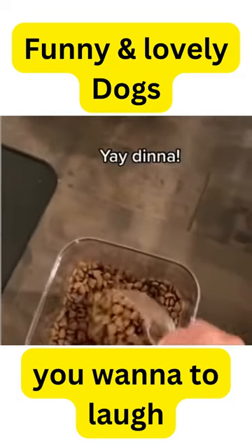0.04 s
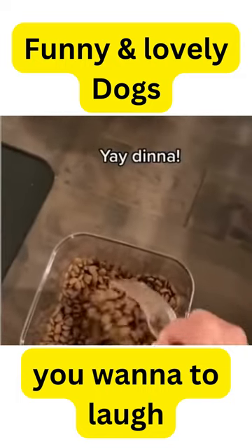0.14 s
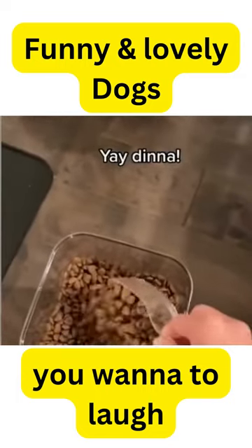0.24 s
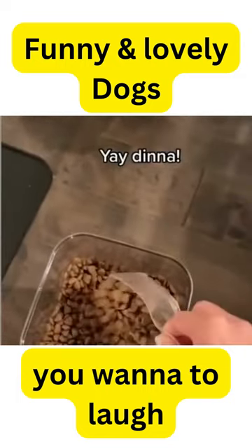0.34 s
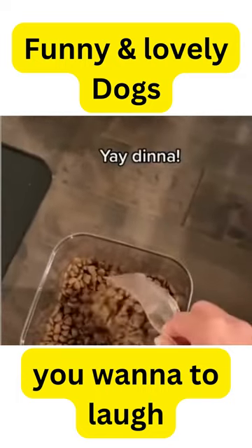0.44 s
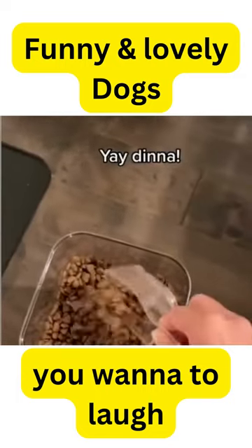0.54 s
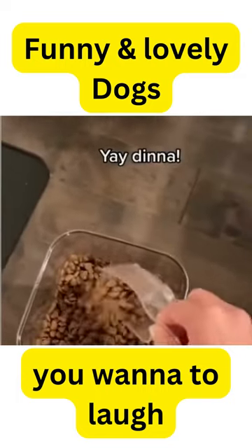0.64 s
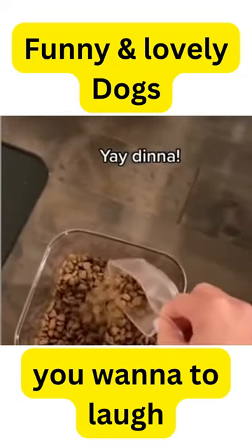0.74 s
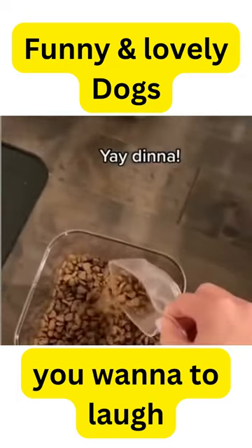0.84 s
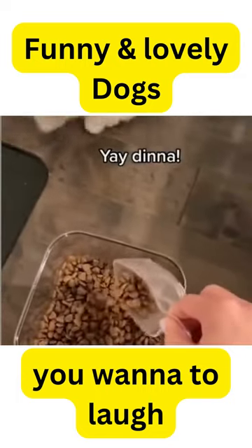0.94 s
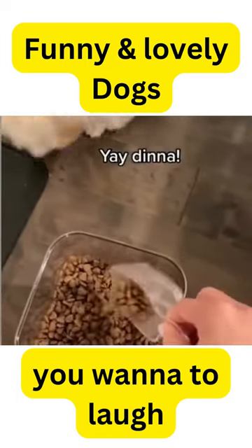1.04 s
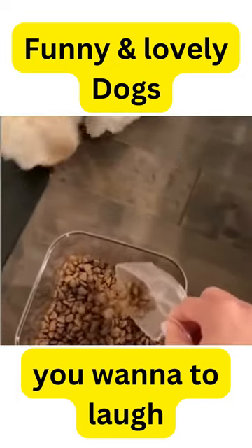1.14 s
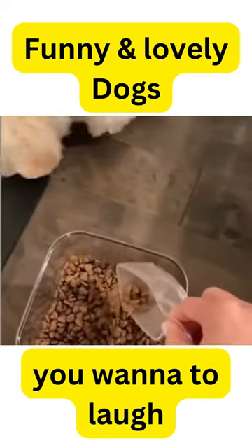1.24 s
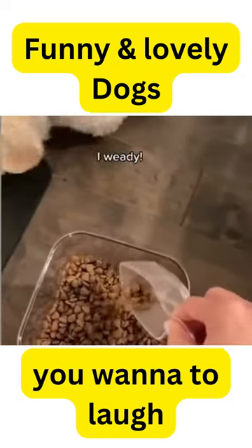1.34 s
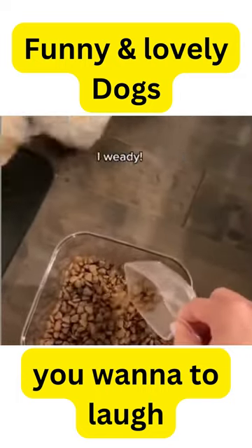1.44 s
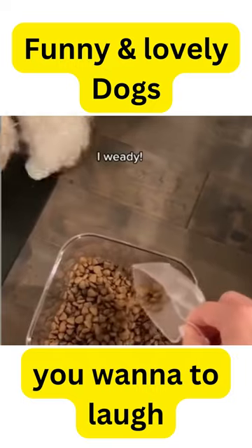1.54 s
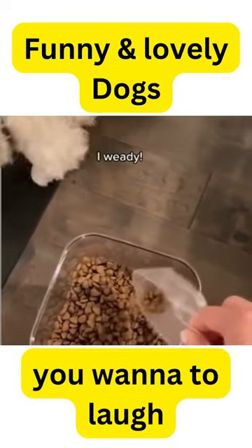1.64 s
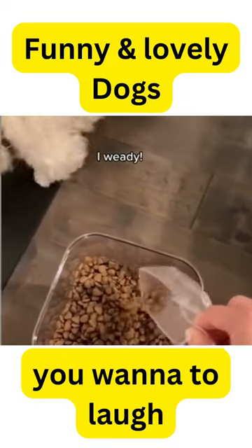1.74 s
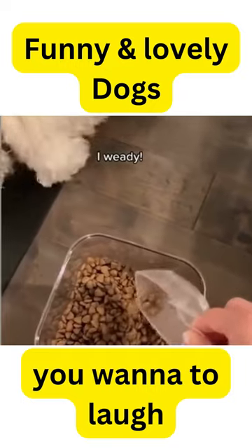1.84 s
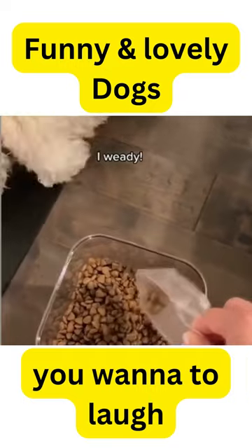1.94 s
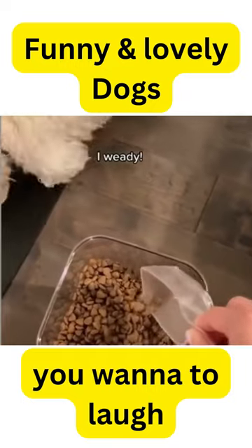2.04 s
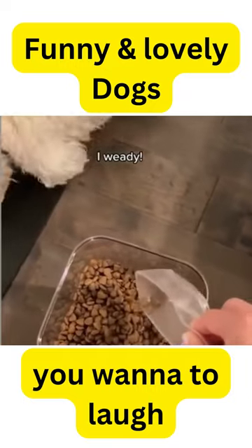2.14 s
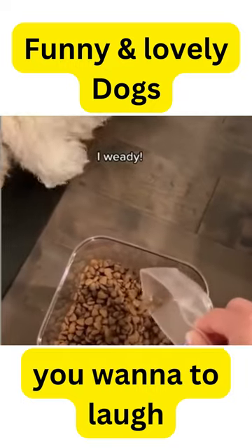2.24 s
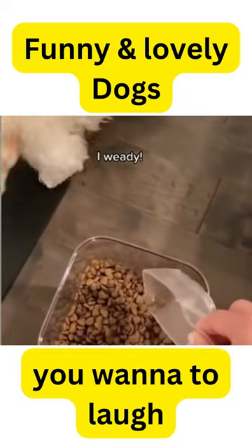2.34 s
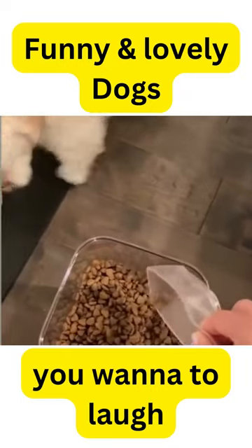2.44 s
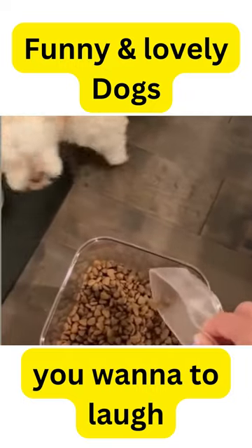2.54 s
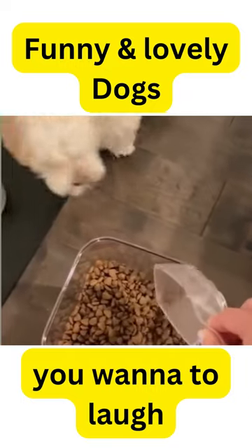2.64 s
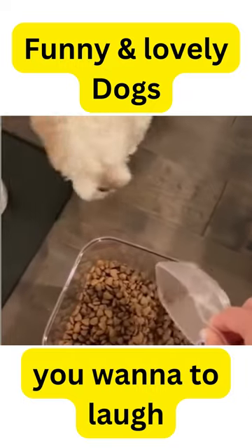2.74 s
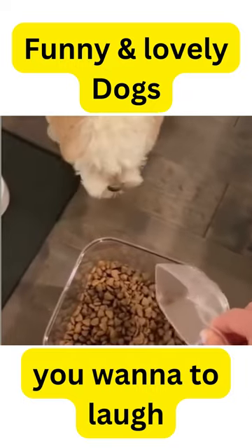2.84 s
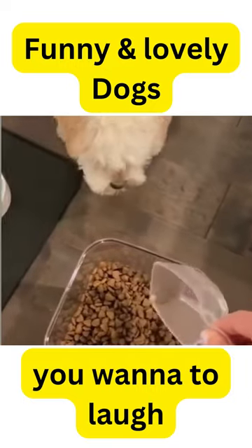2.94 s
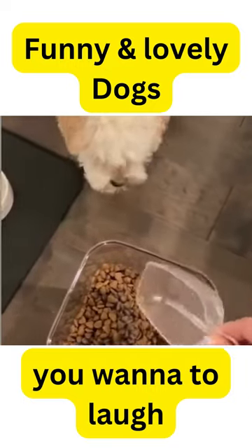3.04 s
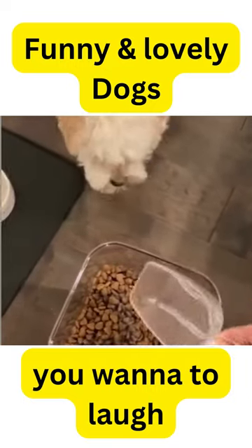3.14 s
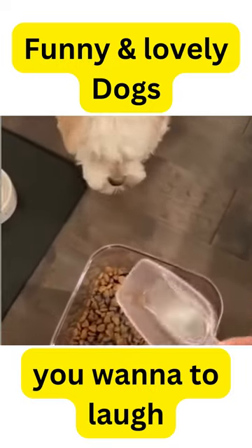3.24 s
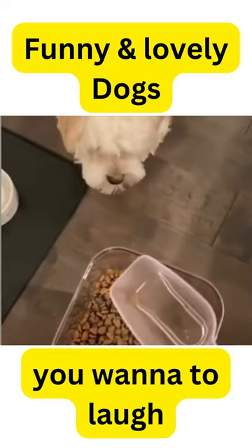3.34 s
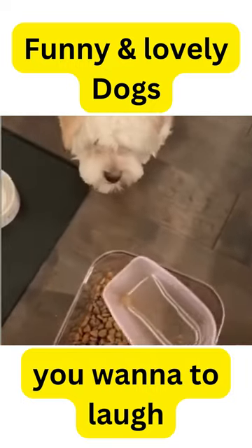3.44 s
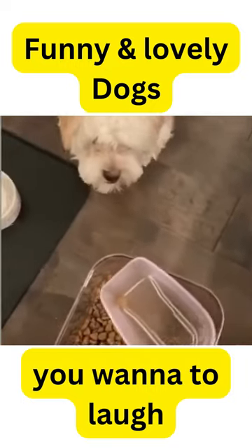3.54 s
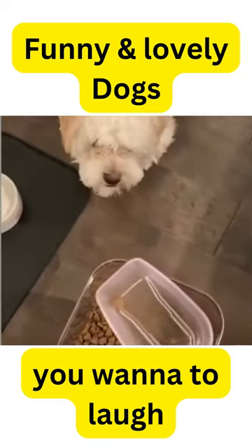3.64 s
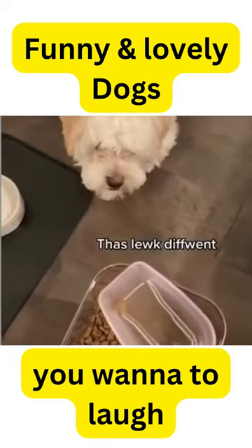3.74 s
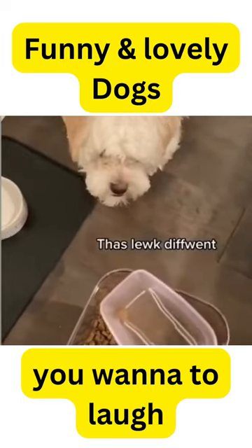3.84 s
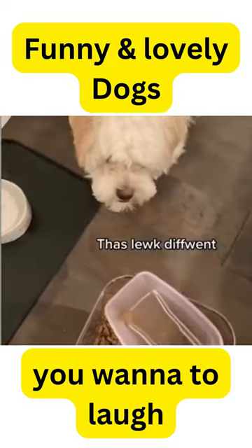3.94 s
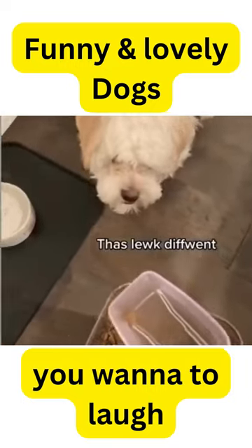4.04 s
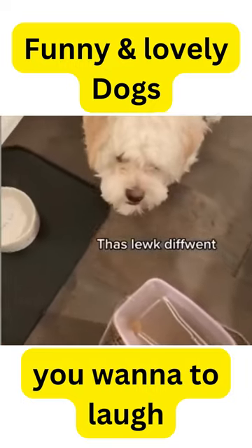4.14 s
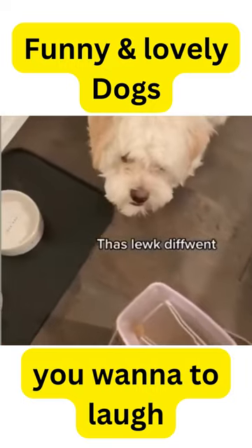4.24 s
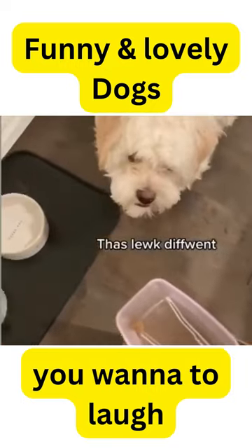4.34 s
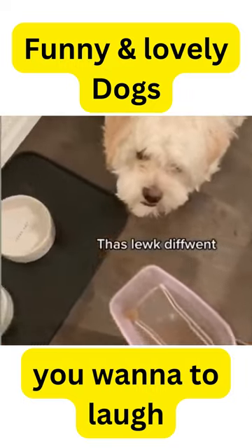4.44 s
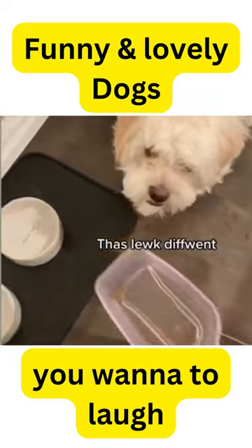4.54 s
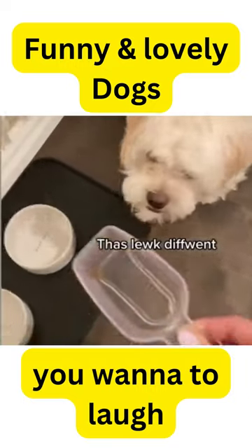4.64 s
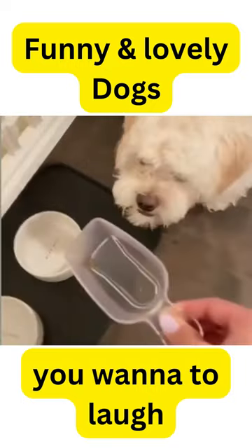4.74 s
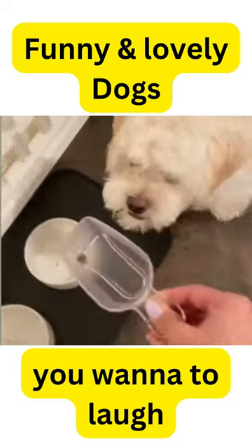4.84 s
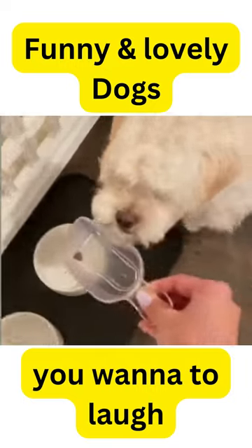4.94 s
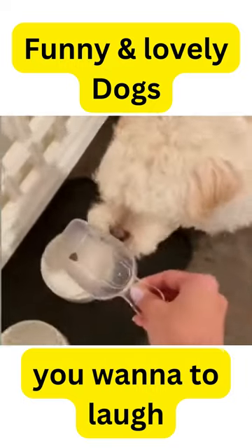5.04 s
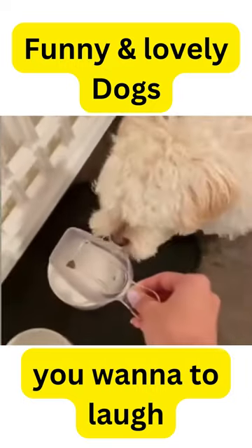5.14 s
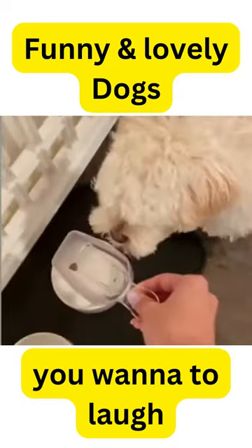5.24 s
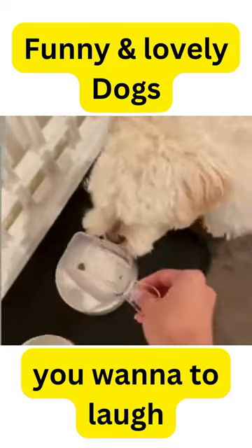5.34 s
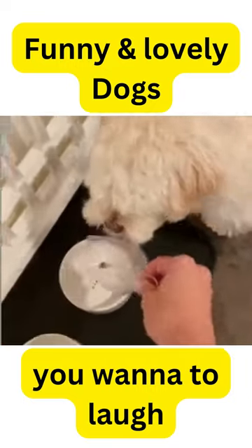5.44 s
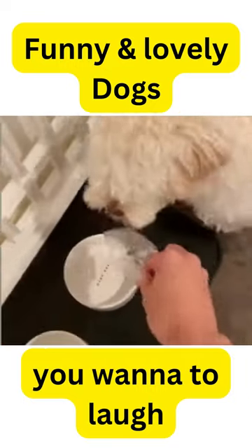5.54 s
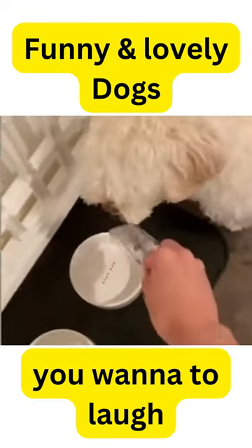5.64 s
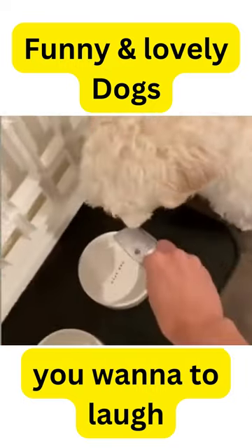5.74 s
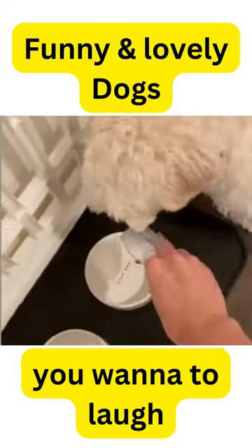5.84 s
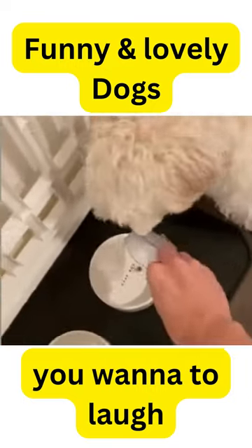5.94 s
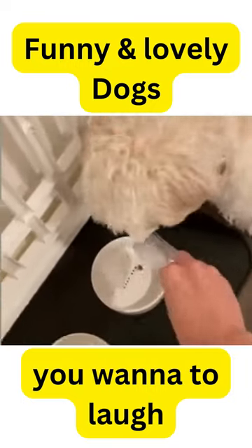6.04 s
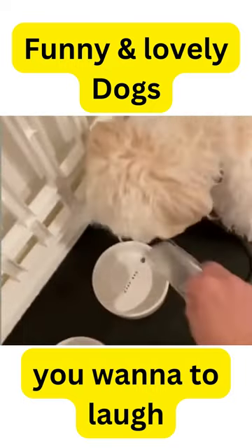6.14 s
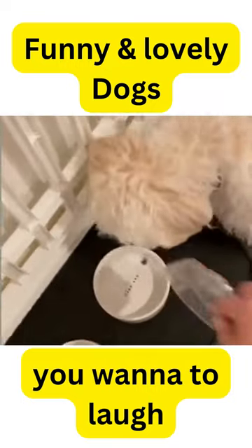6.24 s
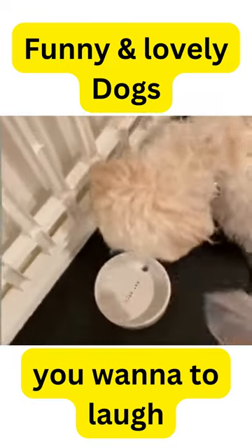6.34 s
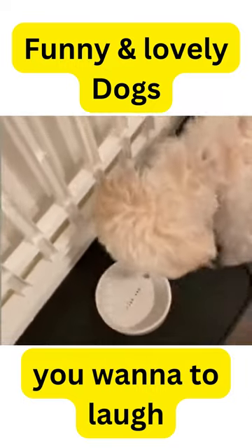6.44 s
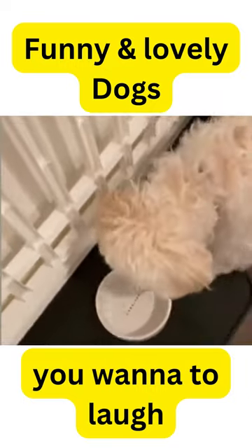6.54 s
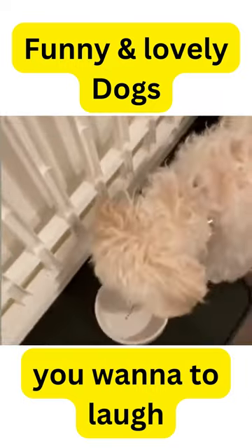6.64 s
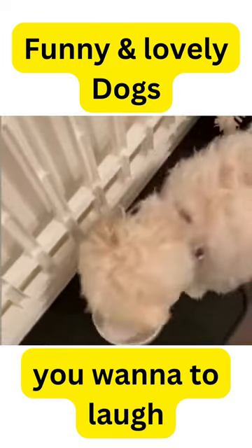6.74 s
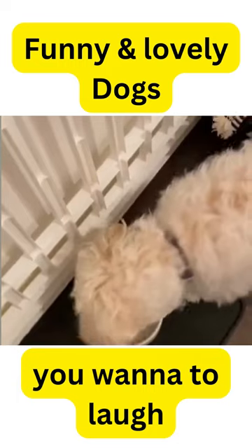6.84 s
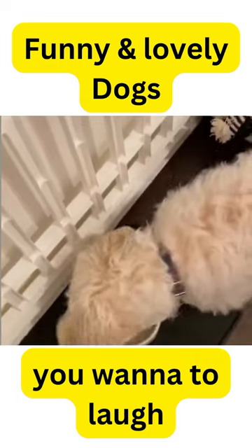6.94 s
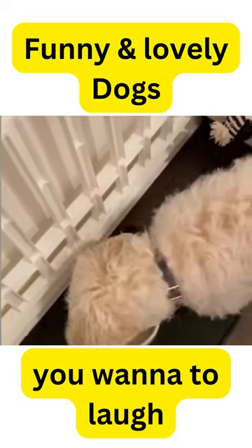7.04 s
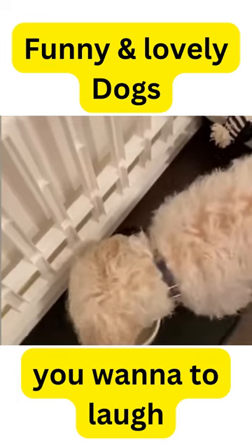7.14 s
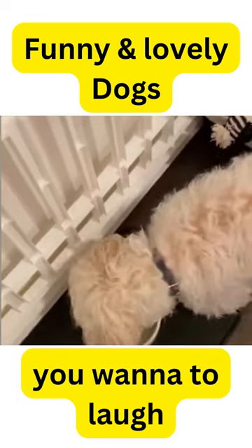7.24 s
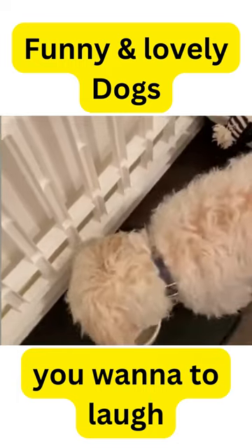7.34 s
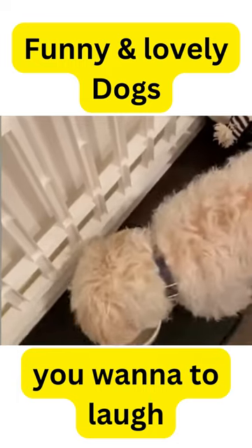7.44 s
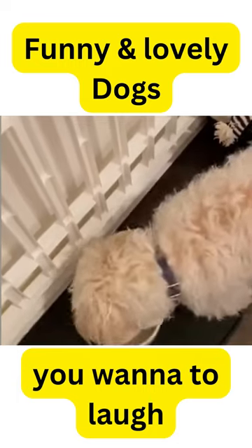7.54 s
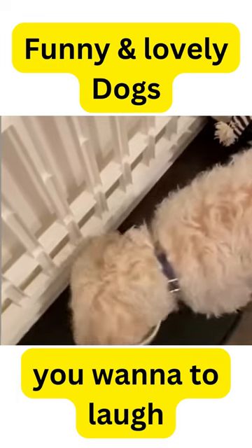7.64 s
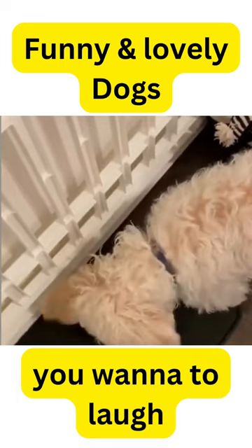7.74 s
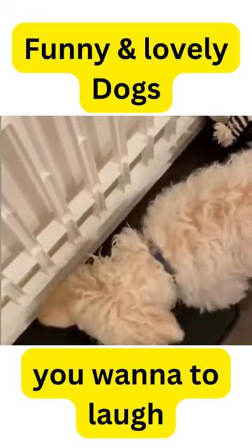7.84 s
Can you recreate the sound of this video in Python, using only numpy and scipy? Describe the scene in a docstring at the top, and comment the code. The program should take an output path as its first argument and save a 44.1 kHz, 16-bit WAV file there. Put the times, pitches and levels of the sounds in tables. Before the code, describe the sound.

In a small kitchen with a low appliance hum, dry kibble pours from a hard plastic scoop back into its container in clattering bursts, thinning to scattered clicks. Quiet rubbing, soft steps and faint taps follow. Then a single piece hits a ceramic bowl with a loud bright clink, bounces and skitters, with a low bump near the microphone. Soft nosing and shuffling end it. Close handheld pickup.

```python
"""A kitchen with an appliance humming; dry kibble slides down a plastic scoop into its glass box.
The first rush thins to single pieces: scoop walls ring in narrow modes, the heap crackles, the box drums.
Taps, soft steps and rubbing follow; a hiss marks the scoop tilting over a ceramic bowl.
The last piece bounces, rings and skitters there as decaying tones and noise, with a low bump close to
the microphone. A small dog shuffles closer and noses the bowl: filtered-noise ticks, steps and swishes."""
import sys
import numpy as np
from scipy import signal
from scipy.fft import rfft, irfft, next_fast_len
from scipy.io import wavfile
from scipy.ndimage import uniform_filter1d, map_coordinates

SR = 44100
rng = np.random.default_rng(int(sys.argv[2]) if len(sys.argv) > 2 else 0)


def inscribe(sig):
    """Save sig as 16-bit PCM at rate SR to the path in sys.argv[1].

    A 1-D sig is mono; a 2-D sig holds one channel per row.
    Samples are clipped to [-1, 1] before scaling.
    """
    pcm = np.round(np.clip(np.atleast_2d(sig).T, -1, 1) * 32767)
    wavfile.write(sys.argv[1], SR, pcm.astype(np.int16))


N = 347508

# appliance hum, louder toward the bowl: (time [s], relative level [dB])
HUM_LEVEL = [(0, -55.5), (3.4, -58.5), (5.2, -49), (6.5, -46.5), (7.88, -48.5)]
# hum tones: (frequency [Hz], relative level [dB])
HUM_TONES = [(60, -7.5), (120, 3)]
# colour of the low rush of the kitchen: (frequency [Hz], relative level [dB])
AIR_COLOUR = [(30, -16), (57, -2), (85, -6), (170, -19), (300, -20.5), (500, -29.5), (800, -33.5),
              (1500, -42.5), (6000, -54.5), (15000, -62.5)]
# batches of kibble sliding down the scoop: (start [s], length [s], relative level [dB])
SLIDES = [(0.014, 0.21, -45), (0.306, 0.2, -46), (0.544, 0.26, -41.5), (0.97, .1, -55.5),
          (1.055, 0.13, -42), (1.38, 0.066, -51.5), (1.578, 0.21, -56), (2.014, 0.14, -61),
          (2.501, 0.038, -57), (5.762, 0.21, -73.5)]
# modes of the scoop wall: (frequency [Hz], width [Hz], relative level [dB])
SCOOP_MODES = [(1769, 79, -10.5), (2243, 63, -4.5), (2771, 87, -5.5), (2933, 90, -10.5), (4164, 33, -7),
               (4810, 77, -1), (5550, 64, -7), (6180, 110, -7), (6690, 40, -10.5), (8300, 37, -7.5),
               (9930, 232, -7), (14600, 300, -7)]
# pieces knocking the scoop wall: (time [s], relative level [dB], pitch of the piece [Hz])
KNOCKS = [(.396, -26.5, 5050), (0.4775, -25, 5800), (0.5526, -33, 2460), (.5884, -27, 3520),
          (.6104, -25.5, 2680), (0.6538, -32, 2500), (0.7079, -22, 2730), (0.724, -25.5, 2720),
          (1.087, -24.5, 3600), (1.121, -20, 4200), (1.189, -23.5, 5400), (1.39, -29, 4200),
          (1.4222, -28.5, 4830), (1.886, -33, 2640), (2.107, -37, 2500), (2.155, -34, 3900),
          (2.54, -44, 3900), (2.6237, -37, 4200), (2.9747, -39, 6470), (3.286, -38, 2300),
          (5.872, -44.5, 7820), (5.9437, -41, 7800)]
# single pieces landing on the heap: (time [s], relative level [dB])
PIECES = [(0.053, -24.5), (0.123, -42), (0.8518, -23.5), (.863, -28), (0.8857, -29), (.891, -20.5),
          (1.255, -28), (1.262, -27), (1.293, -24.5), (1.3335, -31), (1.379, -34), (1.508, -27),
          (1.557, -31.5), (1.601, -27), (1.697, -26.5), (1.8056, -28.5), (1.9365, -31.5), (1.9447, -30),
          (1.997, -42.5), (2.2437, -27), (2.7335, -26.5)]
# colour of kibble on kibble: (frequency [Hz], relative level [dB])
CRACK_COLOUR = [(400, -41), (900, -13.5), (1400, -19), (2200, -11.5), (5000, -6), (8000, -0.5), (10300, 6),
                (12500, -2), (15000, 2.5)]
# colour of the loaded box: (frequency [Hz], relative level [dB])
BOX_COLOUR = [(70, -42), (150, -5.5), (240, 5.5), (450, -3.5), (570, 6.5), (720, -10), (920, -7),
              (1300, -17.5), (2800, -67)]
# dull knocks of box and scoop: (time [s], peak level [dB], dull above [Hz])
TAPS = [(2.001, -46, 440), (2.738, -50, 484), (3.9833, -40.5, 910), (4.007, -46.5, 1100), (4.06, -48, 3400),
        (5.068, -48.5, 1470)]
# rubbing of hand, scoop and fur: (time [s], level before the swell [dB], decay t60 [s], centre [Hz])
SWISHES = [(2.087, -51, 0.34, 1500), (2.279, -50, 0.58, 2740), (2.421, -55.5, .3, 603),
           (2.527, -57, .55, 10700), (3.252, -51.5, 0.12, 1920), (3.945, -51.5, 0.4, 2900),
           (5.212, -53.5, 0.63, 3000), (5.517, -55, 0.21, 3000), (5.556, -62.5, 1.65, 2500),
           (6.138, -52.5, 0.74, 2475), (6.9, -63.5, 2.6, 1400), (7.105, -60, 0.23, 3200),
           (7.221, -59, 0.45, 4200), (7.404, -51.5, 0.15, 3760), (7.55, -62, 0.21, 2600)]
# small ticks of scoop, claws and muzzle: (time [s], relative level [dB], pitch [Hz])
TICKS = [(2.385, -45, 9000), (2.849, -55, 2760), (2.901, -48.5, 8040), (3.285, -38, 1900),
         (4.81, -51, 7150), (4.917, -53.5, 3660), (5.541, -44.5, 2630), (5.7784, -50, 4250),
         (6.428, -46.5, 5840), (6.754, -49, 1487), (6.943, -44.5, 1567), (6.97, -47.5, 7920),
         (7.187, -52, 7800), (7.324, -48, 2500)]
# soft thumps and footfalls: (time [s], level before the swell [dB])
STEPS = [(3.972, -48.5), (4.03, -53.5), (4.15, -59), (6.165, -46.5), (6.257, -35.5), (7.25, -58)]
# colour of the hiss as the scoop tilts over the bowl: (frequency [Hz], relative level [dB])
HISS_COLOUR = [(3000, -11), (7000, -8.5), (8000, 4), (8700, -9), (9600, 7), (10600, -11), (15000, -10)]
# blows on the bowl: (time [s], relative level [dB], brightness [dB per octave])
CLINKS = [(5.9899, -7, 0), (6.0653, -35, 0), (6.0776, -14, 1), (6.155, -16, -2), (6.208, -37.5, -4),
          (6.264, -35, -2), (6.2865, -37.5, 5), (7.45, -48, 14), (7.7877, -33.5, -4)]
# tones of the bowl: (frequency [Hz], relative level [dB], t60 [s])
BOWL_TONES = [(4786, -2.5, .045), (8384, 0, .034), (10235, -14, .04), (12732, -18, .035), (14835, -9, .022)]
# clatter of a piece on the bowl, bunched around its tones: (frequency [Hz], relative level [dB])
CLATTER_COLOUR = [(3300, -28), (4650, 3), (5500, -1), (6500, -16), (8400, 3), (9200, 0), (10800, -15),
                  (14000, -12), (14900, 4), (15600, -18)]
# the piece spins and skitters between bounces: (start [s], length [s], level [dB])
SKITTERS = [(6.015, 0.054, -46.5), (6.1, 0.081, -51.5), (6.182, 0.11, -59.5)]
# decay of the kitchen's answer: (frequency [Hz], t60 [s])
ROOM_DECAY = [(200, 0.34), (1000, 0.21), (5000, 0.046), (15000, 0.017)]

AIR_DB = -55
SLIDE_RISE_S, SLIDE_STOP_DB_PER_S = 0.036, 105.5
# stream onto the heap: first landing, extra level of the rush, its decay time, then thinning to the end
LAND_S, RUSH_DB, RUSH_S = 0.123, 13, 0.053
THIN_S, THIN_DB_PER_S, EMPTY_S = 0.76, 23.5, 4.4
TAP_T60_S, TAP_LOW_HZ = 0.05, 380
STEP_RISE_S, STEP_T60_S, STEP_DULL_HZ = 0.0041, 0.53, 417
SWISH_RISE_SHARE, SWISH_Q = 0.084, 0.97  # swell as a share of the t60; sharpness of the colour
CATCH_DB, CATCH_PER_S = 3, 220  # unevenness of rubbing and its knots a second
HISS_S, HISS_DB, HISS_T60_S = 5.227, -52.5, 0.54
TOP_HZ = 15800


def amp(db):
    """Decibels to amplitude."""
    return 10 ** (np.asarray(db) / 20)


def unit(x):
    """Scale to rms 1."""
    return x / np.sqrt(np.mean(x ** 2) + 1e-20)


def peaked(x):
    """Scale to peak 1."""
    return x / np.abs(x).max()


def struck(x):
    """Scale a hit to rms 1 over its first two milliseconds."""
    return x / np.sqrt(np.mean(x[:SR // 500] ** 2))


def clock(seconds):
    """Sample times from zero, in seconds."""
    return np.arange(int(seconds * SR)) / SR


def along(points, hz):
    """Read (Hz, value) points on a log frequency axis."""
    f, v = np.transpose(points)
    return np.interp(np.log(hz + 1), np.log(f + 1), v)


def curves(rows):
    """One value per sample for each column after the time."""
    s, *cols = np.transpose(rows)
    return [np.interp(np.arange(N) / SR, s, c) for c in cols]


def wobble(rate):
    """A smooth random curve, rate knots a second."""
    knots = rng.standard_normal(int(N * rate / SR) + 4)
    return map_coordinates(knots, [np.arange(N) * rate / SR])


def filtered(x, response):
    """x times a response of frequency."""
    m = next_fast_len(len(x) + SR // 4)
    spectrum = rfft(x, m) * response(np.fft.rfftfreq(m, 1 / SR))
    return irfft(spectrum, m)[:len(x)]


def noise(spectrum, size):
    """Coloured noise of rms 1."""
    return unit(filtered(rng.standard_normal(size), lambda hz: amp(along(spectrum, hz))))


def band(centre_hz, q, size):
    """Noise of rms 1 in one broad resonance with steep skirts."""
    def resonance(hz):
        detuning = hz / centre_hz - centre_hz / (hz + 1)
        return 1 / (1 + (q * detuning) ** 2)

    return unit(filtered(rng.standard_normal(size), resonance))


def add(track, s, sound):
    """Mix a sound in at time s."""
    part = track[max(0, round(s * SR)):][:len(sound)]
    part += sound[:len(part)]


def contacts(rate, spread_db):
    """Random impulses of uneven size, with about the same mean power throughout."""
    sizes = amp(spread_db * np.minimum(rng.standard_normal(N), 2))
    hits = (rng.random(N) < rate / SR) * sizes
    power = uniform_filter1d(hits ** 2, SR // 30)
    return hits / np.sqrt(np.abs(power) + np.mean(power) / 20)


def uneven_grip():
    """Rubbing surfaces grip and slip: a random gain of rms 1."""
    return unit(amp(CATCH_DB * wobble(CATCH_PER_S)))


def appliance(drift=0.064):
    """Mains hum, its phase drifting slowly, over the low rush of the kitchen."""
    hum_db, = curves(HUM_LEVEL)
    # drift is in radians at the second tone
    t = np.arange(N) / SR + drift * wobble(0.08) / HUM_TONES[1][0] / (2 * np.pi)
    hum = sum(amp(db) * np.sin(2 * np.pi * hz * t) for hz, db in HUM_TONES)
    return amp(hum_db) * hum + amp(AIR_DB) * noise(AIR_COLOUR, N)


def sliding():
    """Rattle strength in the scoop: each batch gathers speed, slides and runs out."""
    t = np.arange(N) / SR
    power = np.zeros(N)
    for s, length, db in SLIDES:
        rise = np.clip((t - s) / SLIDE_RISE_S, 0, 1)
        run_out_db = SLIDE_STOP_DB_PER_S * np.maximum(t - s - length, 0)
        power += (rise * amp(db - run_out_db)) ** 2
    return np.sqrt(power)


def grains(rate=500, spread_db=5, pitch_hz=5200, cycles=16):
    """Pieces jostle each other, each with a short ping at its own pitch."""
    hits = contacts(rate, spread_db)
    at, k = np.flatnonzero(hits), np.arange(SR // 100)
    hz = pitch_hz * 2 ** rng.uniform(-1, 1, N)[at, None]
    turns = hz * k / SR
    # each ping falls 20 dB in the given number of cycles
    pings = hits[at, None] * np.sin(2 * np.pi * turns) * amp(-20 * turns / cycles)
    return unit(np.bincount((at[:, None] + k).ravel(), pings.ravel(), N)[:N])


def scoop(wall_db=0, knock_db=-9, vary_db=4, colour_db=7, ping_db=-5):
    """Each contact rings the thin wall around the piece's own pitch; the shifting load detunes the modes."""
    t = clock(0.1)
    hz, width, db = np.transpose(SCOOP_MODES)[:, :, None]
    decay = np.exp(-np.pi * width * t) * (1 - np.exp(-t / 0.0003))
    fade = amp(db) * np.sqrt(width) * decay

    def ring(piece_hz):
        """One piece strikes one spot: the wall's modes plus the piece's own short ping."""
        octaves_off = np.abs(np.log2(hz[:, 0] / piece_hz))
        strengths = amp(vary_db * rng.standard_normal(len(hz)) - colour_db * octaves_off)
        strengths = strengths * rng.choice([-1, 1], len(hz))
        pitches = hz * (1 + 0.024 * rng.standard_normal(hz.shape))
        modes = strengths @ (fade * np.sin(2 * np.pi * pitches * t))
        ping = np.sin(2 * np.pi * piece_hz * t) * amp(-60 * t / 0.007)
        return struck(struck(modes) + amp(ping_db) * struck(ping))

    blows = contacts(rate=240, spread_db=4.5)
    spots = [ring(4100 * 2 ** rng.uniform(-1.3, 1)) for _ in range(120)]
    wall = np.zeros(N)
    for at in np.flatnonzero(blows):
        add(wall, at / SR, blows[at] * spots[rng.integers(len(spots))])
    out = sliding() * amp(wall_db) * (unit(wall) + amp(-9) * grains())
    for s, level_db, piece_hz in KNOCKS:
        add(out, s, amp(level_db + knock_db) * ring(piece_hz))
    return out


def pieces(settle_db=-24, settle_t60=0.12, snap_db=-6, snap_t60=0.006, thud_db=-53, thud_t60=0.11):
    """A lone piece snaps in its own colour and stirs its neighbours; the box answers softly, swelling later."""
    out, t = np.zeros(N), clock(0.33)
    snap = amp(-60 * t / snap_t60)
    settle = amp(settle_db - 60 * t / settle_t60)
    thud = amp(thud_db - 60 * t / thud_t60) * (1 - np.exp(-t / STEP_RISE_S))
    for s, db in PIECES:
        colour = [(hz, level + rng.normal(0, 3)) for hz, level in CRACK_COLOUR]
        crack = struck(noise(colour, len(t)) * (snap + settle))
        add(out, s, amp(db + snap_db) * crack)
        add(out, s, thud * band(centre_hz=500, q=1, size=len(t)))
    return out


def falling(onset_s=0.0027, end_s=0.061):
    """Strength of the stream on the heap: a first rush, about 1 in the steady fall, then thinning."""
    t = np.arange(N) / SR
    rush_db = RUSH_DB * np.exp(-np.maximum(t - LAND_S, 0) / RUSH_S)
    thinning_db = THIN_DB_PER_S * np.maximum(t - THIN_S, 0)
    onset = np.clip((t - LAND_S) / onset_s, 0, 1)
    end = np.clip((EMPTY_S - t) / end_s, 0, 1)
    return amp(rush_db - thinning_db) * onset * end


def pile(rate=800, spread_db=4.0, crackle_db=-43, jostle_db=-28, jostle_power=0.62,
         rumble_db=-51, rumble_power=0.53):
    """Pieces crackle as they slide and land; fewer, longer shifts drum the box and thin more slowly."""
    stream, t = falling(), clock(0.1)

    def bursts(per_second, t60):
        """The joint envelope of many short, overlapping decays."""
        power = signal.oaconvolve(contacts(per_second, spread_db) ** 2, amp(-120 * t / t60))[:N]
        return np.sqrt(np.abs(power))

    clicks, knocks = bursts(rate, 0.012), bursts(150, 0.06)
    crackle = np.hypot(amp(crackle_db) * stream, amp(jostle_db) * sliding() ** jostle_power)
    rumble = amp(rumble_db) * stream ** rumble_power
    heap = unit(clicks * noise(CRACK_COLOUR, N)) * crackle
    box = unit(knocks * noise(BOX_COLOUR, N)) * rumble
    return heap + box


def taps():
    """Dry, dull knocks with no ring of their own: short noise bursts, soft in bass and treble."""
    out, t = np.zeros(N), clock(0.5)
    for s, db, dull_hz in TAPS:
        body = lambda hz: hz ** 2 / (hz ** 2 + TAP_LOW_HZ ** 2) / (1 + (hz / dull_hz) ** 2)
        knock = filtered(rng.standard_normal(len(t)), body)
        add(out, s, amp(db) * peaked(knock * amp(-60 * t / TAP_T60_S)))
    return out


def handling(tick_t60=0.025, tick_db=-2, step_low_hz=130, step_slope=2.9):
    """Light ticks, padded steps and grainy rubbing as scoop and dog move to the bowl."""
    out, t = np.zeros(N), clock(1.5)
    grip = uneven_grip()

    def swell(rise, t60):
        """A soft start and a steady decay."""
        return (1 - np.exp(-(t / rise) ** 2)) * amp(-60 * t / t60)

    def padded(hz):
        """Soft contact: little deep bass and a dull treble."""
        bass = hz ** 2 / (hz ** 2 + step_low_hz ** 2)
        return bass / np.hypot(1, (hz / STEP_DULL_HZ) ** step_slope)

    def catching():
        """A random stretch of the grip."""
        return grip[rng.integers(N - len(t)):][:len(t)]

    for s, db, length, hz in SWISHES:
        rub = catching() * band(hz, SWISH_Q, size=len(t))
        add(out, s, amp(db) * swell(SWISH_RISE_SHARE * length, length) * rub)
    for s, db, hz in TICKS:
        tick = peaked(band(hz, q=1, size=len(t)) * amp(-60 * t / tick_t60))
        add(out, s, amp(db + tick_db) * tick)
    for s, db in STEPS:
        thump = unit(filtered(rng.standard_normal(len(t)), padded))
        add(out, s, amp(db) * swell(STEP_RISE_S, STEP_T60_S) * thump)
    hiss = catching() * noise(HISS_COLOUR, len(t))
    add(out, HISS_S, amp(HISS_DB) * swell(0.0059, HISS_T60_S) * hiss)
    return out


def bowl(crack_db=-3.5, crack_t60=0.022, haze_db=-35, haze_t60=0.22, hold=0.007,
         after_db=-28, after_t60=0.75, level_db=0.5):
    """Hard kibble rings the ceramic; the ring holds a moment and drops, the lowest tone lingers most."""
    out, t = np.zeros(N), clock(0.34)
    lowest_hz = BOWL_TONES[0][0]
    crack = amp(crack_db - 60 * t / crack_t60) + amp(haze_db - 60 * t / haze_t60)
    for s, db, tilt_db in CLINKS:
        clatter = [(hz, level + tilt_db * np.log2(hz / lowest_hz)) for hz, level in CLATTER_COLOUR]
        ring = crack * noise(clatter, len(t))
        for hz, level, t60 in BOWL_TONES:
            ratio = hz / lowest_hz
            held = amp(-60 * (np.hypot(t, hold) - hold) / t60)
            lingering = amp(after_db - 60 * t / after_t60) / ratio ** 2
            tone = np.sin(2 * np.pi * (hz * t + rng.random()))
            ring += amp(level + tilt_db * np.log2(ratio)) * (held + lingering) * tone
        add(out, s, amp(db + level_db) * peaked(ring * (1 - np.exp(-t / 0.00055))))
    return out


def skitter(ring_t60=0.024, rasp_db=-11):
    """Tiny contacts of the spinning piece rasp on the glaze and ring the bowl, most in its lowest tone."""
    out, t = np.zeros(N), clock(0.1)
    ring = np.zeros(len(t))
    for hz, db, _ in BOWL_TONES:
        ring += amp(db - 60 * t / ring_t60) / hz ** 2 * np.sin(2 * np.pi * hz * t)
    ring *= 1 - np.exp(-t / 0.0012)
    grip = uneven_grip()
    for s, length, db in SKITTERS:
        size = len(clock(length))
        touches = rng.standard_normal(size) * (rng.random(size) < 500 / SR)  # about 500 a second
        sound = signal.fftconvolve(touches, ring)
        add(out, s, amp(db) * sound / np.std(sound[:size]))
        rasp = band(BOWL_TONES[1][0], SWISH_Q, size) * grip[round(s * SR):][:size]
        add(out, s, amp(db + rasp_db) * rasp)
    return out


def bump(s=6.04, db=-27, hz=55, start_hz=230, sag_s=0.006, t60=0.06):
    """One soft, low bump close to the microphone, sinking in pitch."""
    out, t = np.zeros(N), clock(0.5)
    turns = np.cumsum(hz + (start_hz - hz) * np.exp(-t / sag_s)) / SR
    add(out, s, amp(db) * peaked(t * amp(-60 * t / t60) * np.sin(2 * np.pi * turns)))
    return out


def room(x):
    """The kitchen's diffuse answer, 5 ms behind the direct sound and shorter in the treble."""
    hz, t, z = signal.stft(rng.standard_normal(SR // 2), SR, nperseg=256)
    decay = amp(-60 * t / along(ROOM_DECAY, hz)[:, None])
    tail = signal.istft(z * decay, SR, nperseg=256)[1]
    answer = np.pad(tail / np.linalg.norm(tail), (SR // 200, 0))
    return signal.fftconvolve(x, answer)[:N]


def scene():
    """Box, bowl and movement share one kitchen; the close bump and the hum stay dry."""
    box = scoop() + pile() + pieces()
    clinks, movement = bowl() + skitter(), handling() + taps()
    wet = room(amp(-12.0) * box + amp(-6.5) * clinks + amp(-10.5) * movement)
    return box + clinks + movement + wet + bump() + appliance()


def record(dry):
    """A steep low-pass leaves almost nothing above TOP_HZ."""
    return filtered(dry, lambda hz: 1 / np.hypot(1, (hz / TOP_HZ) ** 80))


dry = scene()
out = record(dry)
inscribe(out)
```